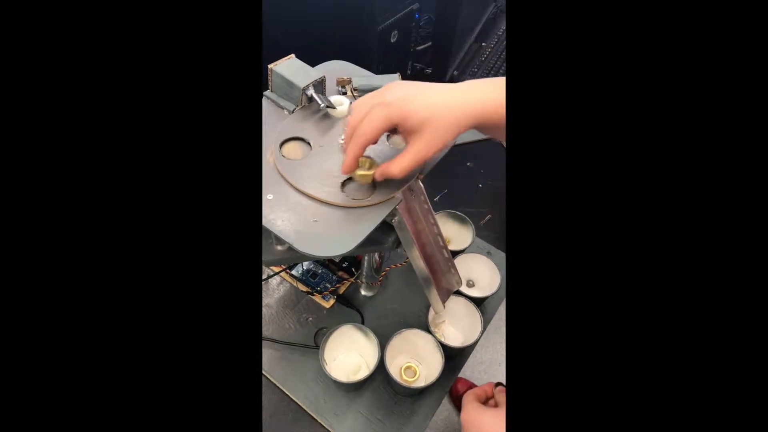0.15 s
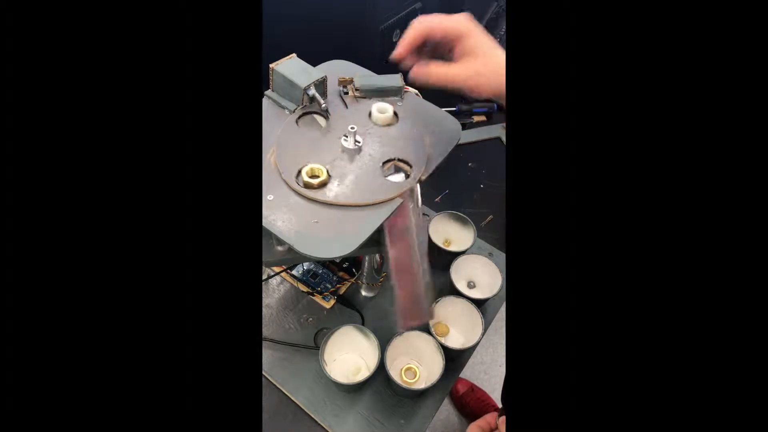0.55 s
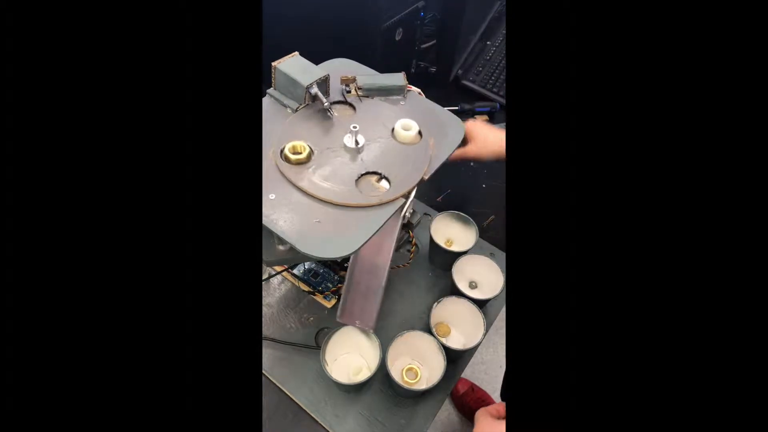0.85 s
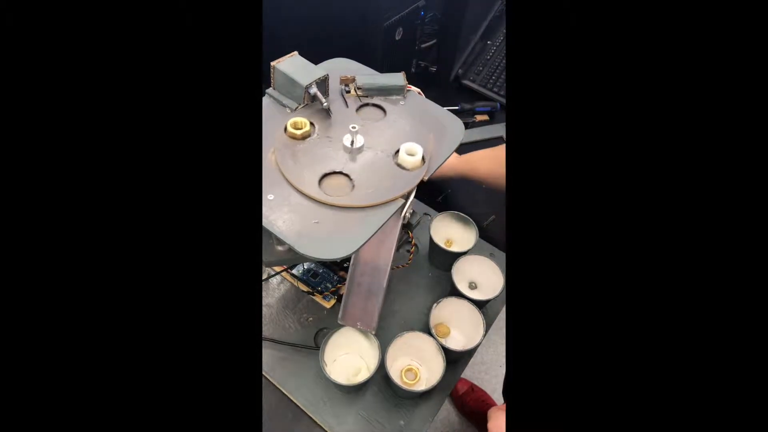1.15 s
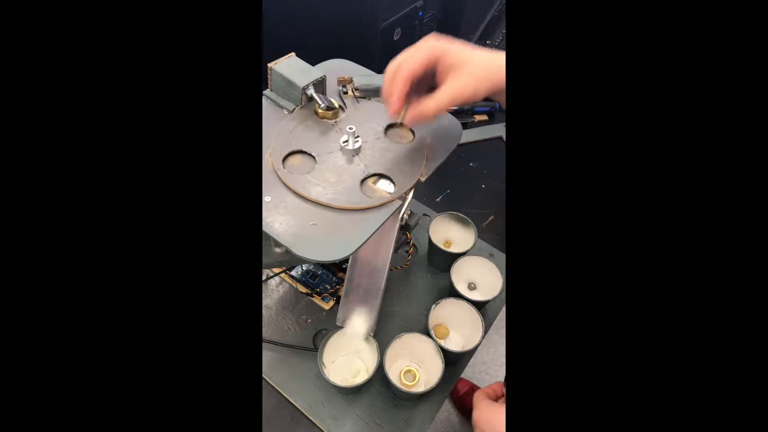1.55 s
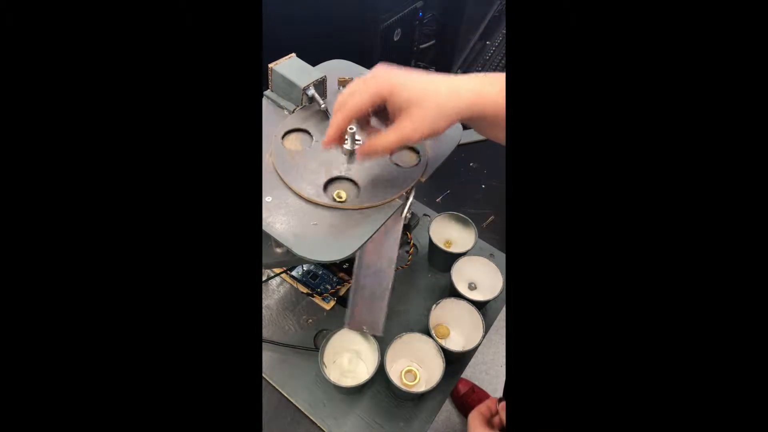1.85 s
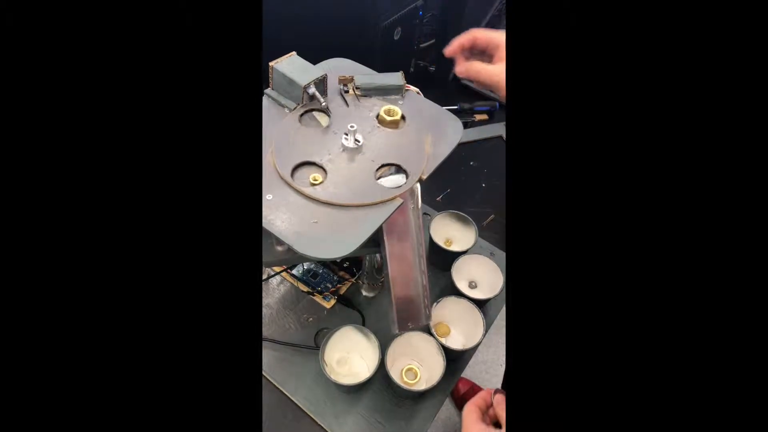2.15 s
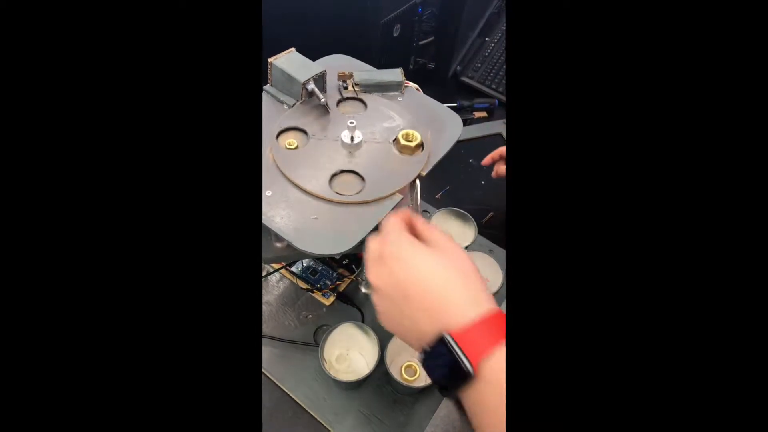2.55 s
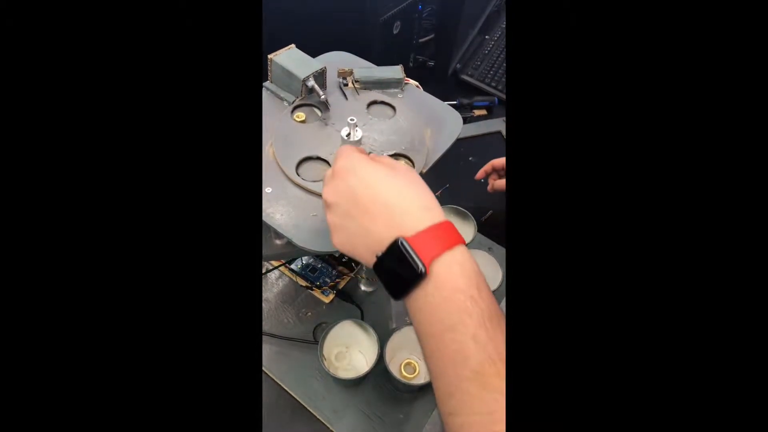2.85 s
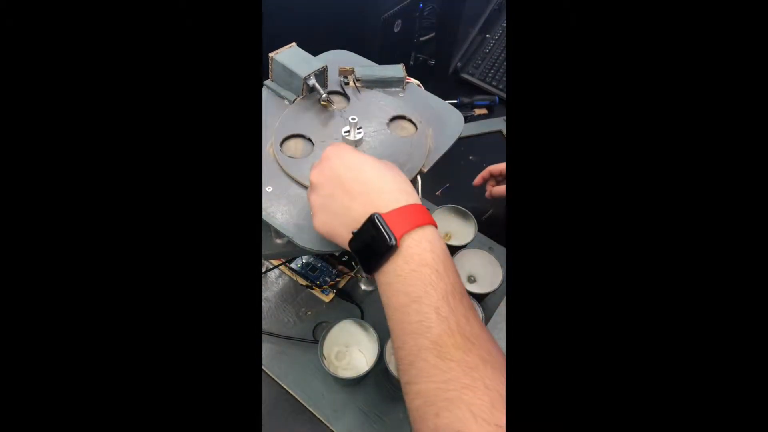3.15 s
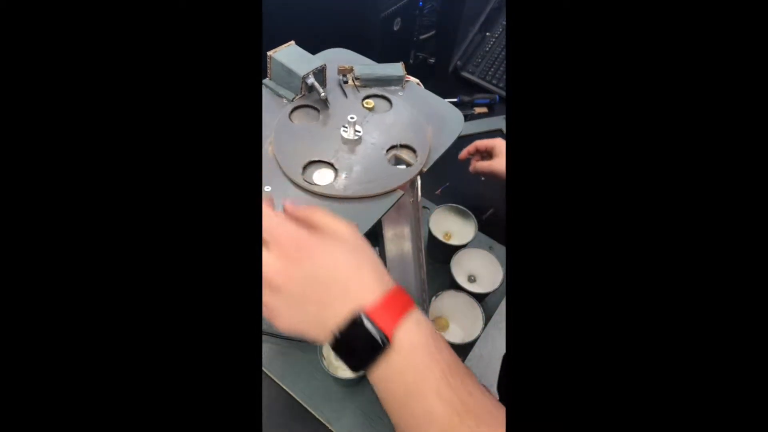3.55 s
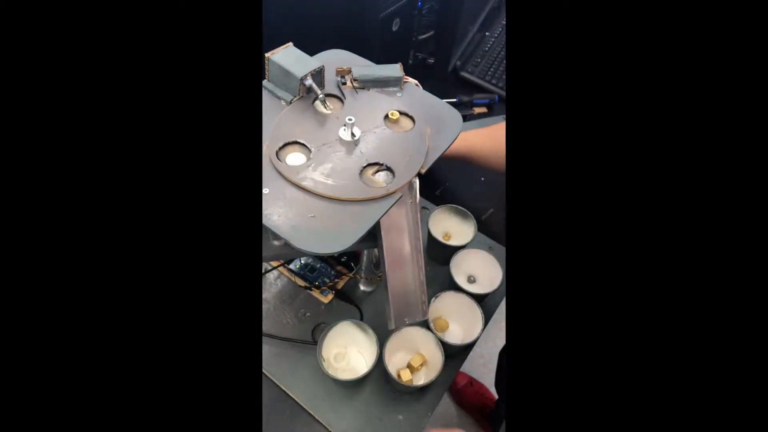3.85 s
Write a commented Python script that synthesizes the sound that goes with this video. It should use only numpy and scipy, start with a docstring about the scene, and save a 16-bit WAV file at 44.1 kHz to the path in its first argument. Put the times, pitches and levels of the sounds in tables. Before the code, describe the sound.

Metal nuts clatter down a ringing sheet-metal chute, the tail of one drop at 0 s, lightly at 1.4-1.7, loudest at 2.9-3.2. Knocks, scrapes and soft thumps with rustling fill 0.1-0.6; a small motor whines near 900 Hz around 0.3 and 0.9-1.4. A bright clink at 1.74, rustle and knocks until 2.1, near quiet, then after the clatter knocks at 3.2-3.7 and whirring from 3.5. Close, dry, quiet room.

```python
"""A bench-top sorter in a quiet room, close to a phone: a small geared motor whines near 900 Hz as wavering
sines over gear noise. Metal nuts slide and bounce down a ringing sheet-metal chute, noise driving resonances.
Knocks on the board and paper cups and short scrapes are bursts of noise with short modes; small parts clink.
Handled parts rustle in tiny ticks and hands thump the frame; rubs and one faint low hum near 195 Hz are
narrow bands of noise, swelling and dying."""
import sys
import numpy as np
from scipy import signal
from scipy.fft import rfft, irfft
from scipy.io import wavfile
from scipy.ndimage import uniform_filter1d

SR = 44100
rng = np.random.default_rng(int(sys.argv[2]) if len(sys.argv) > 2 else 0)


def waveform_to_disk(signal):
    """Save audio, clipped to [-1, 1], as 16-bit WAV at the path in sys.argv[1]."""
    frames = np.transpose(np.atleast_2d(signal))
    scaled = np.clip(frames, -1, 1) * 32767
    samples = np.round(scaled).astype(np.int16)
    wavfile.write(sys.argv[1], SR, samples)


def boost(x):
    """Linear amplitude factor 10**(x/20) for a level x in decibels (scalar or array-like)."""
    u = np.asarray(x, float) / 20
    return 10 ** u


N = 176400
T = np.arange(N) / SR


def noise(count=N):
    """White noise of rms 1."""
    return rng.standard_normal(count)


def curve(rows):
    """Join (seconds, value) rows by straight lines in time."""
    return np.interp(T, *np.array(rows).T)


def unit(x):
    """Scale to rms 1."""
    return x / np.sqrt(np.mean(x ** 2))


def coloured(x, points):
    """Shape a sound by (Hz, dB) points, joined by straight lines over log frequency."""
    log_hz = np.log(np.arange(len(x) // 2 + 1) * SR / len(x) + 1)
    point_hz, point_db = np.transpose(points)
    return irfft(rfft(x) * boost(np.interp(log_hz, np.log(point_hz), point_db)), len(x))


def walk(rate_hz):
    """Random wander of rms 1: noise smoothed twice over one period of the rate."""
    span = int(SR / rate_hz)
    return unit(uniform_filter1d(uniform_filter1d(noise(), span), span))


def ring(x, hz, t60):
    """One resonance that dies by 60 dB in t60 seconds; a unit blow rings with starting amplitude 1."""
    radius = np.exp(-np.log(1000) / (t60 * SR))
    angle = 2 * np.pi * hz / SR
    return signal.lfilter([np.sin(angle)], [1, -2 * radius * np.cos(angle), radius ** 2], x)


def fade(t, t60):
    """Exponential decay from t = 0, down 60 dB after t60 seconds (4 ms at least)."""
    return (t >= 0) * np.exp(-np.log(1000) * np.maximum(t, 0) / max(t60, .004))


def add(out, start_s, x):
    """Mix x into out at start_s seconds."""
    i = int(start_s * SR)
    out[i:i + len(x)] += x[:N - i]


def room():
    """Quiet coloured background noise whose level wanders."""
    # Background colour. Each row: frequency in Hz, level in dB.
    room_colour = [(60, -24), (200, -8), (600, -18), (2500, -24.5), (14000, -42)]
    level_db = -73 + 1.8 * walk(7.9)
    return unit(coloured(noise(), room_colour)) * boost(level_db)


def motor():
    """Whine lines with wavering phase over a band of gear noise, sharing one changing level."""
    # Whine lines. Each row: frequency in Hz, level in dB against the motor level.
    whine_lines = [(845, -11.5), (909.5, 2.5), (974, -7)]
    # Motor level over time. Each row: time in seconds, level in dB.
    motor_level = [(0, -67), (.3, -45), (.66, -57.5), (.91, -44.5), (1.08, -42.5), (1.34, -48.5),
                   (1.46, -62), (2.2, -64.5), (2.48, -57.5), (2.85, -64), (3.1, -72.5), (3.55, -47.5),
                   (3.75, -43.5), (3.83, -50), (3.95, -46.5)]
    # Colour of the gear noise. Each row: frequency in Hz, level in dB.
    gear_colour = [(450, -43.5), (620, 3.5), (950, 15.5), (1250, -11), (3500, -27.5)]
    lines = np.zeros(N)
    for hz, db in whine_lines:
        phase = 2 * np.pi * hz * T + .5 * walk(51)
        lines += boost(db) * np.sqrt(2) * np.sin(phase)
    gears = unit(coloured(noise(), gear_colour)) * boost(-9.5 + 2 * walk(11.0))
    return boost(curve(motor_level)) * (lines + gears)


def chute():
    """Each bounce scrapes the sheet's modes for a moment and cracks; sliding keeps them alive."""
    # Modes of the sheet metal. Each row: frequency in Hz, level in dB.
    chute_modes = [(2352, -8.5), (2400, -23.5), (3463, -10.5), (4502, -6.5), (5235, -12), (6498, -12),
                   (6946, -1.5), (8090, -7), (9580, -13), (11650, -15.5), (12985, -18), (14510, -20.5)]
    # Borders between the low, middle and high zones of modes, in Hz.
    zone_borders_hz = (3000, 6000)
    # Bounces of the nuts. Each row: contact in seconds, then relative drive in dB of the low, middle, high zone.
    bounces = [(0.0094, -25.5, -38, -36), (0.0744, -34, -45, -51), (1.4067, -38.5, -34.5, -57),
               (1.4253, -21.5, -36.5, -58.5), (1.4554, -24.5, -32.5, -44.5), (1.5028, -41, -32.5, -50),
               (1.551, -28, -36.5, -50.5), (1.5639, -35, -28.5, -35.5), (1.6594, -21.5, -31, -42.5),
               (2.9214, -48, -30.5, -34.5), (2.9584, -18, -25, -25), (2.9868, -26.5, -26, -34),
               (3.028, -13.5, -31, -37.5), (3.0993, -23, -31.5, -35), (3.17, -45, -40.5, -25)]
    # Sliding between bounces. Each row: start in seconds, end in seconds, relative level in dB.
    slides = [(-.05, 0.081, -30), (1.397, 1.715, -47.5), (2.909, 3.241, -32)]
    # Colour of metal-on-metal noise. Each row: frequency in Hz, level in dB.
    sheet_colour = [(900, -17), (2200, 11), (5500, 10), (15000, -20.5)]
    rise_s, fall_s, lead_s = 0.00322, 0.0089, .004  # the scrape starts just ahead of the crack
    low_frequency_t60_s, rattle_t60_s, crack_t60_s = 0.16, 0.043, 0.042

    t = T[:SR // 8]
    scrape = (1 - np.exp(-t / rise_s)) * np.exp(-t / fall_s)
    scrape = scrape / np.sqrt(np.sum(scrape ** 2))
    slide = sum(boost(db) * (T > start) * (T < end) for start, end, db in slides)
    slide = slide * boost(4.5 * walk(45))
    out = boost(-17.0) * coloured(slide * noise(), sheet_colour)

    for hz, db in chute_modes:
        drive = 0.025 * slide
        zone = np.searchsorted(zone_borders_hz, hz)
        for row in bounces:
            add(drive, row[0] - lead_s, 2 * scrape * boost(row[1 + zone]))
        t60_s = low_frequency_t60_s * (1 - 2 * hz / SR)  # treble dies sooner
        out = out + boost(db + 1.1 * walk(56.0)) * ring(drive * noise(), hz, t60_s)

    rattle = 0.018 * slide
    for start_s, low_db, middle_db, high_db in bounces:
        add(rattle, start_s - lead_s, scrape * boost(max(middle_db, high_db)))
    for hz in 2000 * 7.5 ** rng.random(60):  # many weaker, shorter modes
        out = out + boost(-19.5) * ring(rattle * noise(), hz, rattle_t60_s)

    crack_shape = 1.14 * fade(t, crack_t60_s) * np.minimum(t / 0.0015, 1)
    for start_s, low_db, middle_db, high_db in bounces:
        crack = unit(coloured(noise(len(t)), sheet_colour))
        crack_db = max(low_db - 3, middle_db) - 4
        add(out, start_s, boost(crack_db) * crack * crack_shape)
    return out


def rustle():
    """Handled parts: tiny random ticks over a steady scrape, through narrow resonances that come and go."""
    # Rustle level over time. Each row: time in seconds, level in dB.
    rustle_level = [(.3, -48.5), (.6, -46), (.7, -52), (.9, -70.5), (1.62, -78.5), (1.7, -50.5),
                    (2.14, -41.5), (2.2, -67), (2.88, -85), (3.25, -59.5), (3.78, -50.5), (3.83, -53.5)]
    # Rustle colour. Each row: frequency in Hz, level in dB.
    rustle_colour = [(500, -22), (1600, -2), (3400, 1.5), (6000, -11.5), (15000, -28)]
    ticks_per_s, tick_t60_s = 650, 0.017
    ticks = (rng.random(N) < ticks_per_s / SR) * rng.random(N) ** 2
    tick_envelope = signal.fftconvolve(ticks, fade(T[:1024], tick_t60_s))[:N]
    grain = noise() * (0.098 + 11.0 * tick_envelope)
    bands = np.zeros(N)
    for hz in 600 * 1.22 ** np.arange(17):
        bands += unit(ring(grain, hz, 16 / hz)) * boost(4 * walk(12))  # each dies within 16 cycles
    return unit(coloured(bands, rustle_colour)) * boost(curve(rustle_level))


def knocks_and_scrapes():
    """Knocks and short scrapes: bursts of noise with weaker chatters and a few short modes."""
    # Bursts. Each row: start in seconds, relative level in dB, level near 800 Hz in dB against the middle.
    bursts = [(0.1352, -24, -2.5), (0.1487, -23, 5.5), (0.2423, -23.5, -10), (0.3304, -14, 10),
              (0.3523, -23.5, 11.5), (0.4776, -13.5, 3.5), (0.5251, -14.5, -1), (0.548, -13, 0),
              (0.5684, -18.5, 4.5), (0.6043, -18.5, -16), (1.667, -36, 17.5), (1.7978, -35, 17.5),
              (1.8586, -24.5, 3), (1.8741, -17.5, -1), (1.9627, -24, -23), (2.0075, -13.5, 4.5),
              (3.242, -20, -6.5), (3.3108, -9, -19.5), (3.356, -20, -32), (3.457, -21.5, -42),
              (3.539, -25.5, -22), (3.605, -20, -30), (3.663, -29.5, -34), (3.7072, -24.5, -31),
              (3.733, -23, -27)]
    first_t60_s, body_t60_s, chatter_span_s = 0.019, 0.064, 0.06
    top_db = -8
    out, t = np.zeros(N), T[:8192]
    decay = fade(t, first_t60_s) + 0.29 * fade(t, body_t60_s)
    onset = np.minimum(t / 0.00088, 1)
    for start_s, db, low_db in bursts:
        pitch, phase = rng.random((2, 24, 1))
        mode_hz = 600 * 12 ** pitch
        modes = np.sum(np.sin(2 * np.pi * (mode_hz * t + phase)), axis=0) / 4
        pulses = np.zeros(len(t))
        pulses[0] = 1
        late, size = rng.random((2, 20))
        chatter_at = (late * chatter_span_s * SR).astype(int) + 40
        pulses[chatter_at] = boost(-8.5) * size ** 2 * (1 - late) ** 2  # later chatters are weaker
        shape = signal.fftconvolve(pulses, decay)[:len(t)]
        colour = [(300, low_db - 20.0), (800, low_db), (1500, 0), (4500, 0),
                  (8000, top_db), (15000, top_db - 15.5)]
        body = coloured(noise(len(t)) + modes, colour)
        add(out, start_s, boost(db - 7.5) * body * shape * onset)
    return out


def thumps():
    """Hands on the frame: soft low bursts of noise that swell briefly and die."""
    # Thumps. Each row: start in seconds, rms level in dB before the swell and decay.
    thump_rows = [(0.142, -39.5), (0.336, -36), (0.518, -37), (1.714, -39.5), (3.234, -36.5), (3.829, -56)]
    frame_colour = [(80, -14.5), (165, 1), (230, -5.5), (305, 1.5), (1200, -25)]  # (Hz, dB)
    out, t = np.zeros(N), T[:SR // 4]
    shape = fade(t, 0.26) * np.minimum(t / 0.014, 1)
    for start_s, db in thump_rows:
        shake = unit(coloured(noise(len(t)), frame_colour))
        add(out, start_s, boost(db) * shake * shape)
    return out


def nut():
    """Short scraping taps, as bursts of noise, on the modes of a small hard ring."""
    # Taps on the nut. Each row: start in seconds, relative level in dB.
    taps = [(.263, -32), (0.303, -32.5), (0.338, -31)]
    # Modes of the nut. Each row: frequency in Hz, level in dB.
    nut_modes = [(7840, -4.5), (10470, -5.5), (12740, 7)]
    drive, t = np.zeros(N), T[:SR // 20]
    for start_s, db in taps:
        add(drive, start_s, 0.06 * boost(db) * fade(t, 0.055))
    return sum(boost(db) * ring(drive * noise(), hz, 0.11) for hz, db in nut_modes)


def clinks():
    """Small parts: a noisy click of contact and one short sine ring each."""
    # Clinks. Each row: start in seconds, level in dB, ring frequency in Hz.
    clink_rows = [(.288, -27.5, 3200), (0.623, -22.5, 2810), (0.638, -32, 3170), (1.7078, -24.5, 7990),
                  (1.742, -14, 7610), (1.768, -34.5, 574), (3.4216, -30.5, 4870), (3.7558, -36, 2580),
                  (3.7723, -25.5, 3210), (3.8935, -52, 2800)]
    ring_t60_s, click_t60_s = 0.018, .02
    out, t = np.zeros(N), T[:SR // 16]
    for start_s, db, hz in clink_rows:
        tone = np.sin(2 * np.pi * hz * t) * fade(t, ring_t60_s)
        click = unit(coloured(noise(len(t)), [(hz / 2, -20), (hz, 0), (15000, -26)]))
        click = boost(-4.5) * click * fade(t, click_t60_s)
        add(out, start_s, boost(db) * (tone + click))
    return out


def rubs_and_hum():
    """Narrow bands of noise, swelling and dying: noise through one resonance taken twice, level wandering."""
    # Rubs, and one faint low hum near 195 Hz.
    # Each row: start in seconds, end in seconds, frequency in Hz, level in dB before the wander.
    narrow_bands = [(0.638, 0.864, 3480, -54.5), (.74, 1.042, 1684, -61), (1.078, 1.25, 7400, -63),
                    (2.21, 2.54, 1590, -66), (2.48, 2.855, 195, -69), (3.816, 4.033, 3070, -65.5)]
    out = np.zeros(N)
    for start, end, hz, db in narrow_bands:
        progress = np.clip((T - start) / (end - start), 0, 1)
        swell = np.sqrt(np.clip(np.sin(np.pi * progress), 0, 1))
        band = unit(ring(ring(noise(), hz, 17 / hz), hz, 17 / hz))
        out += boost(db + 6.6 * walk(43)) * swell * band
    return out


def scene():
    """Everything together, with a short dull echo of decaying smoothed noise on the hits and the chute."""
    hits = chute() + knocks_and_scrapes() + thumps() + nut() + clinks()
    t = T[:SR // 3]
    echo_delay_s, echo_t60_s = .006, 0.24
    echo = uniform_filter1d(noise(len(t)), size=3) * fade(t - echo_delay_s, echo_t60_s)
    wet = signal.fftconvolve(hits, echo / np.sqrt(np.sum(echo ** 2)))[:N]
    mix = hits + boost(-26.5) * wet + motor() + rustle() + rubs_and_hum() + room()
    return mix[None]  # one channel


def low_pass(x):
    """Removes everything above the highest recorded frequency."""
    return signal.sosfilt(signal.butter(12, 16820, fs=SR, output="sos"), x)


def record(dry):
    """The phone's microphone loses the deep bass, as a second-order high-pass at 97 Hz."""
    microphone = signal.butter(2, 97, "high", fs=SR, output="sos")
    heard = signal.sosfilt(microphone, dry)
    return low_pass(heard)


dry = scene()
out = record(dry)
waveform_to_disk(out)
```